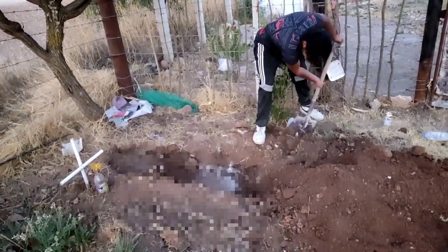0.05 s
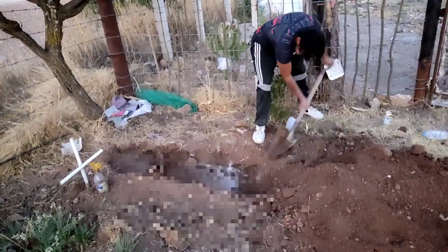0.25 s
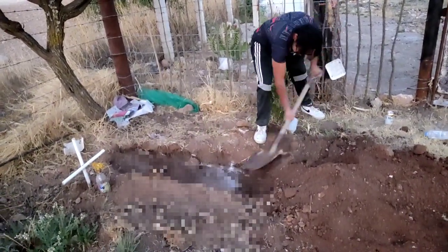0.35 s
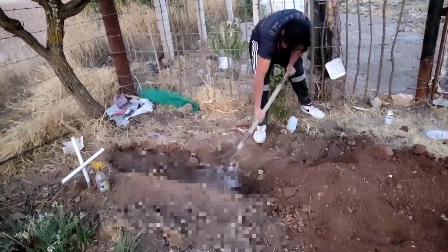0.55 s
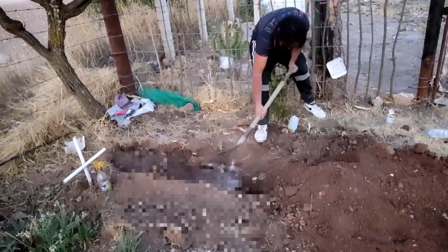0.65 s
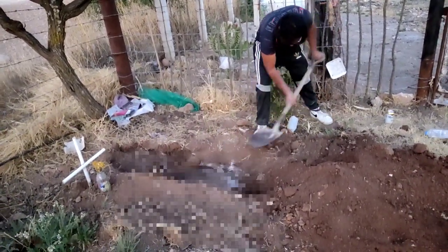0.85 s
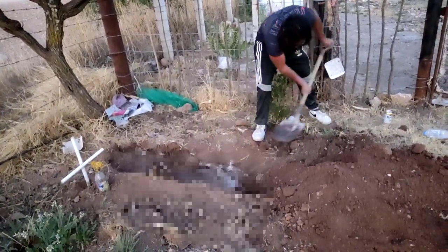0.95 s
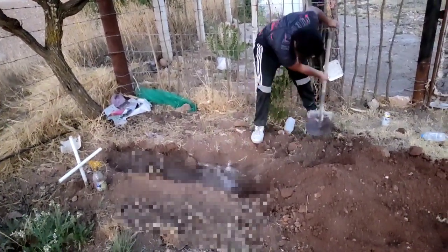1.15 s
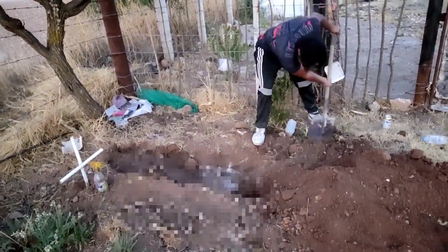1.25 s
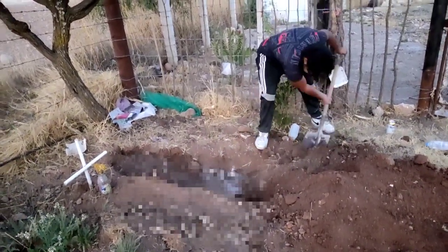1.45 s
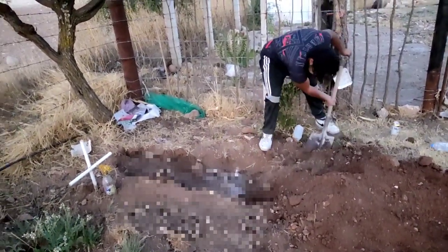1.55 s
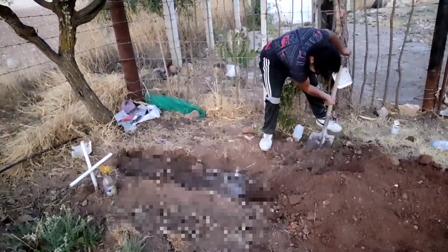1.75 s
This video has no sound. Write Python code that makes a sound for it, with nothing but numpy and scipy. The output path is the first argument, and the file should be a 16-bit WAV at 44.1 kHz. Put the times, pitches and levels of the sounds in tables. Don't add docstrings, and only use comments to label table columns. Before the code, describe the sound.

Shovel digging in gritty, stony earth: harsh scrape, light toss, crunching stab, with wind buffeting the microphone

```python
import sys
import numpy as np
from scipy import signal
from scipy.fft import rfft, irfft
from scipy.io import wavfile
from scipy.ndimage import uniform_filter1d, map_coordinates

SR = 44100
rng = np.random.default_rng(int(sys.argv[2]) if len(sys.argv) > 2 else 0)


def convert_level_to_amplitude(level_db):
    exponent = np.asarray(level_db, float) / 20
    return 10 ** exponent


def output_pcm(signal):
    pcm = np.clip(np.atleast_2d(signal).T, -1, 1) * 32767
    wavfile.write(sys.argv[1], SR, np.round(pcm).astype(np.int16))


N = 77175
T = np.arange(N) / SR
GRAINS_PER_S, GRAIN_SPREAD_DB, SHARED = 14000, 3.5, 0.65
STROKE_PAN_DB, STROKE_ENDS_S = [-0.5, 4, 2.5], [0.433, 1.2]


def unit(x):
    return x / np.sqrt(np.mean(x ** 2))


def colour(x, table):
    hz, db = np.array(table).T
    f = np.maximum(np.fft.rfftfreq(N, 1 / SR), 1)
    gain = convert_level_to_amplitude(np.interp(np.log(f), np.log(hz), db))
    return irfft(rfft(x) * gain, N)


def ring(x, hz, t60):
    r = np.exp(-np.log(1000) / (max(t60, .005) * SR))
    return signal.lfilter([np.sqrt(1 - r * r)], [1, -r * np.exp(2j * np.pi * hz / SR)], x).imag


def curve(table, k, fade_s=0.0074):
    c = np.array(table)
    inside = np.minimum(T - c[0, 0], c[-1, 0] - T)
    gate = np.clip(inside / fade_s + 1, 0, 1)
    return convert_level_to_amplitude(np.interp(T, c[:, 0], c[:, k])) * gate


def walk(rate):
    k = int(SR / rate)
    steps = np.repeat(rng.standard_normal(N // k + 1), k)
    w = uniform_filter1d(uniform_filter1d(steps, k), k)[:N]
    return unit(w - w.mean())


def grains(rate):
    on = rng.random(N) < rate / SR
    size_db = GRAIN_SPREAD_DB * np.minimum(rng.exponential(size=N), 3)
    return unit(on * rng.standard_normal(N) * convert_level_to_amplitude(size_db))


def pair(shared, rate=GRAINS_PER_S):
    both, s = grains(rate), np.clip(shared, 0, 1)
    return np.array([np.sqrt(s) * both + np.sqrt(1 - s) * grains(rate) for _ in range(2)])


# frequency in Hz, level in dB per Hz.
HUM_SPECTRUM = [(59, -31.5), (100, -16.5), (236, -7), (472, -1.5), (546, -7.5), (1920, -21), (2230, -15),
                (9860, -32), (15000, -21)]


def hum():
    alike_hz, level_db = 1200, -53.5
    mid, side = rng.standard_normal((2, N))
    side = side - signal.sosfilt(signal.butter(1, alike_hz, fs=SR, output="sos"), side)
    x = colour(mid + side * np.array([[1], [-1]]), [(40, -32)] + list(HUM_SPECTRUM))
    return unit(x) * convert_level_to_amplitude(level_db + 1.0 * walk(6.06))


# time in seconds, level in dB, left minus right in dB.
WIND_PRESSURE = [(0.0, -31, 13.0), (0.048, -37, 13), (0.082, -36, 10), (0.116, -31.5, 12.0),
                 (0.14, -42, 10.5), (0.276, -50, -28), (0.438, -53.5, 3), (0.492, -40, -24.0),
                 (0.53, -48.5, 1.5), (0.604, -40, -20), (0.642, -49, -6), (0.954, -57.5, 5),
                 (1.062, -54, 0), (1.16, -53, 10.5), (1.462, -53, -6.5), (1.524, -37.5, 16),
                 (1.706, -41, 5), (1.75, -42.5, -37)]


def wind():
    rumble_hz, flicker_db = 79, 2.5
    flap_hz, flap_db, flap_power = 171, -2.5, 1.9
    rustle_db = -21
    c = np.array(WIND_PRESSURE)
    db, pan = np.interp(T, c[:, 0], c[:, 1]), np.interp(T, c[:, 0], c[:, 2])
    strength = db + np.minimum(np.array([pan, -pan]), 0)

    shape = [(10, -12), (35, 0), (rumble_hz, -4), (160, -14), (300, -34), (1000, -70)]
    rumble = np.array([unit(colour(rng.standard_normal(N), shape)) * convert_level_to_amplitude(flicker_db * walk(14.0))
                       for _ in range(2)])
    rumble = rumble * convert_level_to_amplitude(strength + 3.5)

    flap = np.array([unit(ring(rng.standard_normal(N), flap_hz, 0.0059)) * convert_level_to_amplitude(2.8 * walk(51))
                     for _ in range(2)])
    flap = colour(flap, [(60, -21), (100, -1.5), (280, -3), (450, -29)])
    flap = flap * convert_level_to_amplitude(flap_db - 39.0 + flap_power * (strength + 37.0))

    grass = colour(pair(0.46, 2300), [(200, -21.5), (350, 4.5), (1000, -18.5), (2500, -3), (4000, -31.5)])
    return rumble + flap + unit(grass) * convert_level_to_amplitude(rustle_db + db)


# time in seconds, level in dB, length in seconds (negative when suction
WIND_BUFFETS = [
    (.04, -19.5, -0.003, 0),
    (0.114, -16, -.0022, 0),
    (0.504, -19.5, 0.0017, 1),
    (0.582, -24.5, 0.0078, 1),
    (0.603, -53, 0.00056, 1),
    (1.525, -27.5, -.004, 0),
    (1.607, -32, -.003, 0),
    (1.65, -33, 0.0068, 0),
]


def buffets():
    out = np.zeros((2, N))
    for s, db, length, side in WIND_BUFFETS:
        u = (T - s) / abs(length)
        u = np.where(u > .7, 1.04 + (u - .7) * 0.32, u)
        out[int(round(side))] -= np.sign(length) * convert_level_to_amplitude(db) * 2 * u * np.exp(-u ** 2)
    return out


# time in seconds, level in dB.
TRICKLES = [
    [(0.0, -43), (.04, -46.5), (.1, -48), (.135, -42.5), (.145, -33.5), (0.2, -33)],
    [(0.44, -44), (.5, -45), (0.56, -41.5), (0.6, -41.5)],
    [(0.75, -51), (.84, -48.5), (.87, -45.5), (0.96, -49.5), (1.07, -61.5)],
    [(1.55, -48), (1.6, -49.5), (1.65, -45), (1.75, -50)],
]


def trickle():
    return sum(curve(c, 1) for c in TRICKLES) * convert_level_to_amplitude(0.87 * walk(39.6))


# time in seconds, peak in dB, rise in seconds, burst t60 in seconds,
# pressure on the blade in dB.
STONE_KNOCKS = [(0.0348, -36.5, .008, 0.03, -22), (0.0702, -25, 0.00068, 0.044, -21.5),
                (0.085, -31.5, 0.0013, 0.025, -20), (0.206, -15, 0.00076, 0.076, -31),
                (0.2246, -8.5, 0.0021, 0.031, -26), (0.2298, -14, 0.0032, 0.028, -10),
                (0.257, 1, 0.00053, 0.032, -8.5), (0.3009, -2.5, 0.0028, 0.087, -17),
                (0.318, -11, 0.0029, 0.037, -28), (0.3224, -3.5, 0.0065, 0.022, -13),
                (0.3448, 1.5, 0.0011, 0.014, -25), (0.355, -13, 0.00084, 0.033, -27),
                (.405, -26, 0.0016, 0.023, -36), (0.476, -31, .002, 0.039, -38),
                (0.5161, -26.5, 0.0032, 0.047, -14.5), (0.575, -39, .002, 0.031, -30),
                (0.604, -14, 0.00049, 0.0092, -38), (0.6222, -13.5, 0.0017, 0.012, -31),
                (0.653, -20.5, 0.00055, 0.069, -20), (0.6659, -20, 0.0019, 0.017, -14.5),
                (0.692, -23, .002, 0.07, -23), (0.852, -44.5, 0.0024, 0.21, -19),
                (1.293, -16, 0.0015, 0.048, -6), (1.3599, 0, 0.00049, 0.054, -19.5),
                (1.38, -12.5, 0.0024, 0.066, -9), (1.425, -1, 0.0043, 0.041, -28),
                (1.455, -8.5, 0.0022, 0.029, -12.5), (1.464, -5.5, 0.0034, 0.012, -32),
                (1.499, -19, .002, 0.051, -23), (1.6217, -56, .002, 0.054, -34),
                (1.635, -41, 0.0015, 0.029, -34)]


def stones():
    hiss, push = 0, 0
    for s, db, rise, t60, press_db in STONE_KNOCKS:
        d = np.maximum(T - s, 0)
        decay_db = -60 * np.maximum(d - rise, 0) / max(t60, .01)
        g = convert_level_to_amplitude(db - 8 + decay_db) * np.minimum(d / max(rise, .0002), 1)
        hiss = hiss + g ** 2
        push = push + (g * convert_level_to_amplitude(press_db + 12.0)) ** 2
    return hiss, push


# time in seconds, grit level in dB, pressure on the blade in dB.
PULL_STROKE = [
    (.2, -36.5, -2.5),
    (.232, -22.5, -19.5),
    (.252, -33, -6.5),
    (.285, -21, -7),
    (.31, -17.5, -2.5),
    (.35, -21, -3.5),
    (.37, -22, -16.5),
    (.41, -26.5, -10.5),
    (.46, -64.5, -15),
]
# time in seconds, grit level in dB, pressure on the blade in dB.
TOSS_STROKE = [
    (0.57, -60, -12),
    (.6, -45, -23),
    (0.628, -35.5, -13),
    (.645, -38, -9),
    (.7, -37.5, -12.5),
    (.74, -50.5, -8.5),
    (0.77, -56, -28),
]
# time in seconds, grit level in dB, pressure on the blade in dB.
STAB_STROKE = [
    (1.287, -65, 9),
    (1.298, -24, 0),
    (1.341, -35, -8.5),
    (1.365, -21.5, -11),
    (1.41, -22, -9.5),
    (1.466, -23.5, -11),
    (1.478, -28.5, -5),
    (1.52, -33.5, -8.5),
    (1.57, -54, -20),
]


def strokes():
    hiss, push = 0, 0
    for stroke in (PULL_STROKE, TOSS_STROKE, STAB_STROKE):
        g = curve(stroke, 1)
        hiss = hiss + g ** 2
        push = push + (g * curve(stroke, 2) * convert_level_to_amplitude(5)) ** 2
    return hiss, push


# frequency in Hz, level in dB.
GRIT_SPECTRUM = [(300, -58), (800, -27.5), (1500, -5), (3000, -1.5), (5000, -3.5), (7500, -0.5),
                 (11000, 2.5), (15000, 1)]


def grit(strength, shared):
    return colour(pair(shared) * strength, GRIT_SPECTRUM)


# frequency in Hz, level in dB.
CRUNCH_SPECTRUM = [(250, -62), (480, -22), (650, -2), (1500, -2.5), (3000, 5), (5500, 2), (8000, -7.5)]


def crunch(strength):
    return colour(pair(0.97, 5000) * strength, CRUNCH_SPECTRUM)


def chinks(drive, low_hz, high_hz, t60, shared, count=20):
    hits_per_s = 150
    pitch = low_hz + (high_hz - low_hz) * (np.arange(count) + rng.random(count)) / count
    return sum(ring(pair(shared, hits_per_s) * drive, hz, t60) for hz in pitch) / np.sqrt(count)


def pebbles(hiss, push, loose):
    small = chinks(hiss + 0.47 * loose, 4013, 14000, .022, SHARED)
    large = chinks(push, 1347, 6400, .055, 0.93)
    return convert_level_to_amplitude(-9.5) * colour(small, GRIT_SPECTRUM) + convert_level_to_amplitude(-11) * large


def blade(modes, drive):
    waver_db = 4
    stroke = np.searchsorted(STROKE_ENDS_S, T)
    out = 0
    for hz, t60, *dbs in modes:
        level = convert_level_to_amplitude(np.array(dbs)[stroke] + waver_db * walk(45.08))
        out = out + ring(drive * level, hz, t60) * convert_level_to_amplitude(1.0 * rng.standard_normal((2, 1)))
    return out


# frequency in Hz, t60 in seconds, level in dB in pull, toss and stab.
BLADE_PAN = [(1206, 0.091, -18, -27, -16), (1432, 0.18, -5, -16, -18), (1502, 0.16, 0, -36, -8.5),
             (1993, 0.15, -4.5, -20, -6), (2269, 0.09, -3, 8, 0.5), (2518, 0.047, -2, -31, 1),
             (2688, 0.092, -0.5, 6.5, -4.5), (2844, 0.11, -8, 6, -21), (3184, 0.14, -2, -15, 0),
             (3404, 0.11, 4.5, 3.5, 0), (3562, 0.097, -2, -8, -3.5), (4140, 0.07, -10, -28, -28),
             (4354, 0.07, -5, -4, 0), (4860, 0.11, -6, 4, -35)]
# frequency in Hz, t60 in seconds, level in dB in pull, toss and stab.
BLADE_EDGE = [(8340, .03, -5.5, 5, -5), (8690, 0.025, -1, -14, -14.5), (8790, 0.034, -7.5, -10, -18),
              (8720, 0.0333, 0.5, 5.5, -7), (9270, 0.032, 0.5, -29, -21), (9320, 0.021, 0, -18, -28),
              (9770, 0.025, -2, 5.5, -9), (10440, 0.025, -6, -2, -7), (9600, 0.029, -5.5, -6, -12),
              (10900, .03, -10.5, -3, -23), (10760, 0.023, -12, 0, -3.5), (11040, 0.036, -11.5, -8, -20),
              (12230, 0.024, -10.5, -21, -30)]


def steel(hiss, push):
    pan = convert_level_to_amplitude(-16.5) * blade(BLADE_PAN, pair(0.64) * push)
    edge = convert_level_to_amplitude(-18) * blade(BLADE_EDGE, pair(SHARED) * hiss)
    return colour(pan + edge, [(450, -41.5), (1000, -2.0)])


def shovel():
    loose = trickle()
    stone_hiss, stone_push = stones()
    stroke_hiss, stroke_push = strokes()
    hiss = np.sqrt(stone_hiss + stroke_hiss) * convert_level_to_amplitude(0.91 * walk(90))
    push = np.sqrt(stone_push + stroke_push) * convert_level_to_amplitude(2.52 * walk(70))
    soil = convert_level_to_amplitude(-10.5) * grit(hiss, SHARED) + convert_level_to_amplitude(-9.5) * crunch(push + 0.52 * loose)
    digging = steel(hiss, push) + soil + pebbles(hiss, push, loose)
    pan_db = np.array(STROKE_PAN_DB)[np.searchsorted(STROKE_ENDS_S, T)]
    return convert_level_to_amplitude(np.array([pan_db, -pan_db]) / 2) * digging + convert_level_to_amplitude(-10.0) * grit(loose, 0.087)


# frequency in Hz, t60 in seconds, level in dB.
EMPTY_BLADE = [(1151, 0.27, -2), (1455, 0.36, -0.5), (1488, 0.48, -2.5), (1939, 0.19, -5.5),
               (2815, .2, -9.5), (3300, 0.2, 0), (4360, .15, -9), (5400, .12, -13)]


def free_ring():
    centre_s, span_s, level_db = 0.38, 0.037, -41
    drive = pair(0.81) * np.exp(-((T - centre_s) / span_s) ** 2) * convert_level_to_amplitude(level_db)
    return sum(convert_level_to_amplitude(db) * ring(drive, hz, t60) for hz, t60, db in EMPTY_BLADE)


THUD_STARTS = [1.295, 1.296, 1.297, 1.362, 1.39, 1.45, 1.46, .86]
# level in dB, frequency in Hz, t60 in
# seconds.
TIP_THUDS = [
    (-39, 303, 0.168),
    (-41.5, 590, 0.12),
    (-31.5, 2060, 0.13),
    (-45, 560, 0.14),
    (-44, 370, 0.12),
    (-45, 280, 0.15),
    (-51, 690, 0.32),
    (-62, 810, 0.22),
]


def thuds():
    out = 0
    for s, (db, hz, t60) in zip(THUD_STARTS, TIP_THUDS):
        burst = (T > s) * convert_level_to_amplitude(db - 60 * np.maximum(T - s, 0) / t60) * rng.standard_normal(N)
        out = out + ring(burst, hz, 0.0094) * 3
    return colour(out, [(110, -25), (200, -1.5)])


def echoes(near):
    level_db, t60_s = -7.5, 0.054
    d = T[:int(.2 * SR)]
    tail = rng.standard_normal((2, len(d))) * convert_level_to_amplitude(-60 * d / t60_s) * (d > .002)
    tail = tail / np.sqrt(np.sum(tail ** 2, axis=1, keepdims=True))
    return convert_level_to_amplitude(level_db) * signal.fftconvolve(near, tail, axes=1)[:, :N]


def port(x, hz, width, lift_db, db):
    return convert_level_to_amplitude(db) * (x + convert_level_to_amplitude(lift_db) * signal.lfilter(*signal.iirpeak(hz, hz / width, fs=SR), x))


# time in seconds, lag in seconds.
RIGHT_PORT_LAG = [(.2, 0.000058), (.3, 0.000038), (.45, 0.000038), (.6, 0.000019), (.8, 0.000036),
                  (1.28, 0.000099), (1.42, 0.00011), (1.55, 0.000096)]
# resonance in Hz, width in Hz, lift in dB, level in dB.
MIC_PORTS = [(10810, 2100, 11, 0), (8320, 1910, 13, -3)]


def through_ports(near):
    late = np.arange(N) - SR * np.interp(T, *np.array(RIGHT_PORT_LAG).T)
    near = np.array([near[0], map_coordinates(near[1], [late], mode="nearest")])
    left, right = (port(x, *p) for x, p in zip(near, MIC_PORTS))
    right = signal.sosfilt(signal.butter(2, 10200, fs=SR, output="sos"), right)
    return np.array([left, right])


def duck(loud):
    threshold_db, release_s = -34.5, 0.43
    r = np.exp(-1 / (release_s * SR))
    return (1 + signal.lfilter([1 - r], [1, -r], np.abs(loud)) / convert_level_to_amplitude(threshold_db)) ** -.5


def scene():
    near = shovel() + free_ring() + thuds()
    near = near + echoes(near) + convert_level_to_amplitude(-68.5) * rng.standard_normal((2, N))
    heard = through_ports(near)
    return heard + hum() * duck(heard[0]) + wind() + buffets()


def top_cut(x):
    return signal.sosfilt(signal.butter(12, 15220, fs=SR, output="sos"), x)


def record(dry):
    top_hz = 14300
    mix = signal.sosfilt(signal.ellip(8, .2, 45, top_hz, fs=SR, output="sos"), np.tanh(dry))
    return top_cut(mix)


dry = scene()
out = record(dry)
output_pcm(out)
```